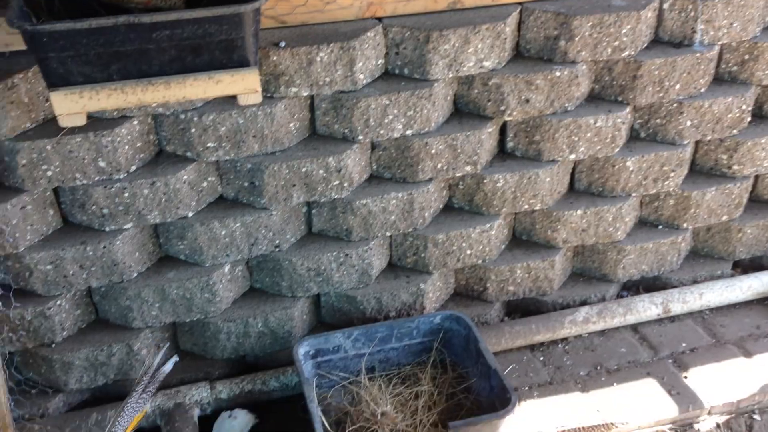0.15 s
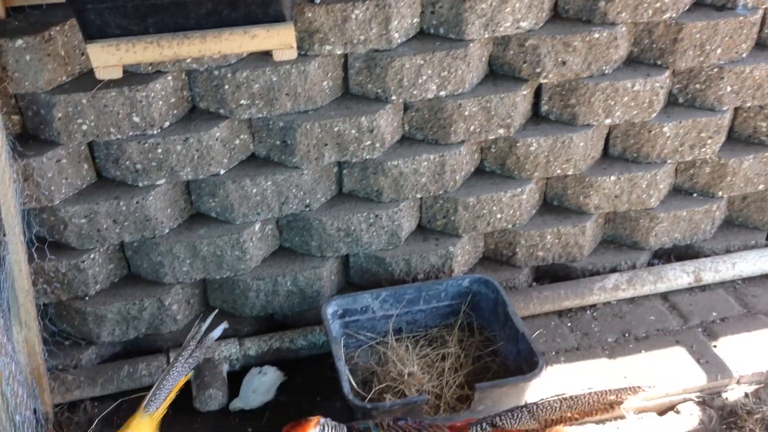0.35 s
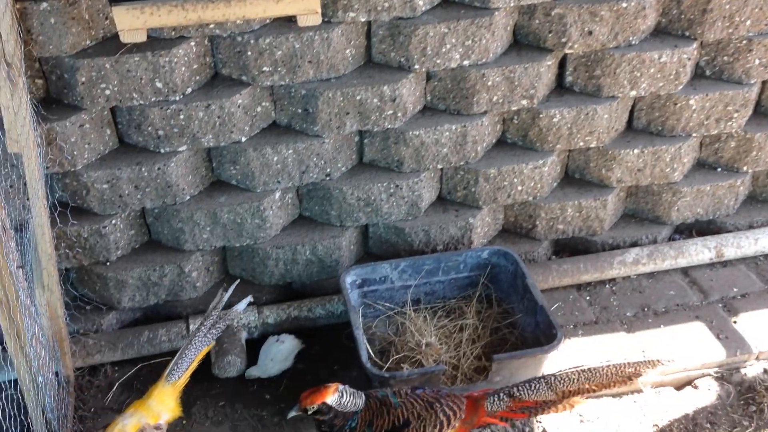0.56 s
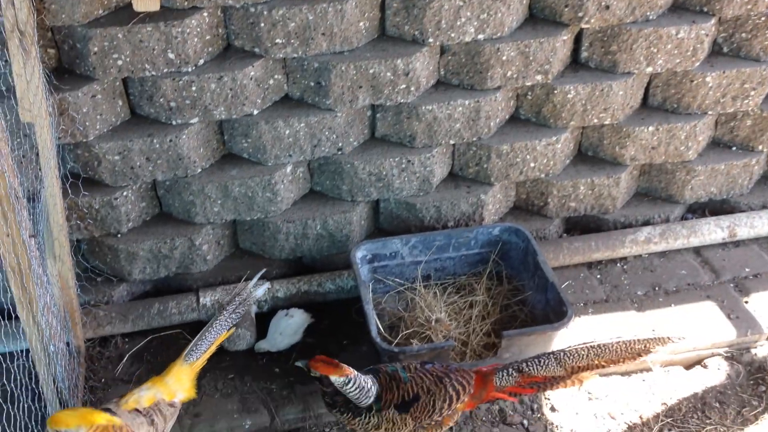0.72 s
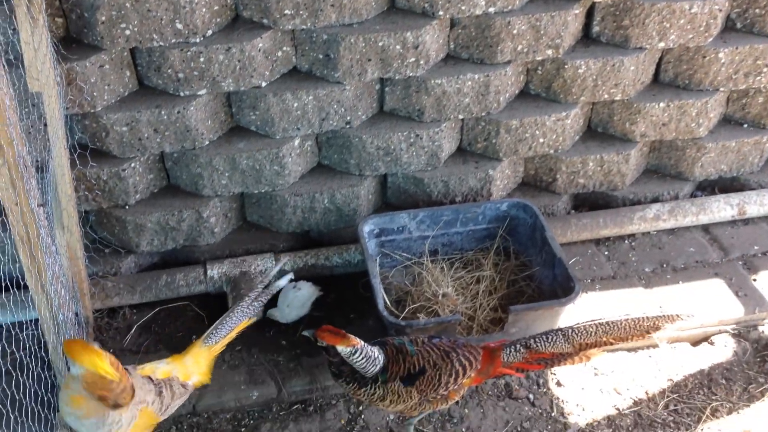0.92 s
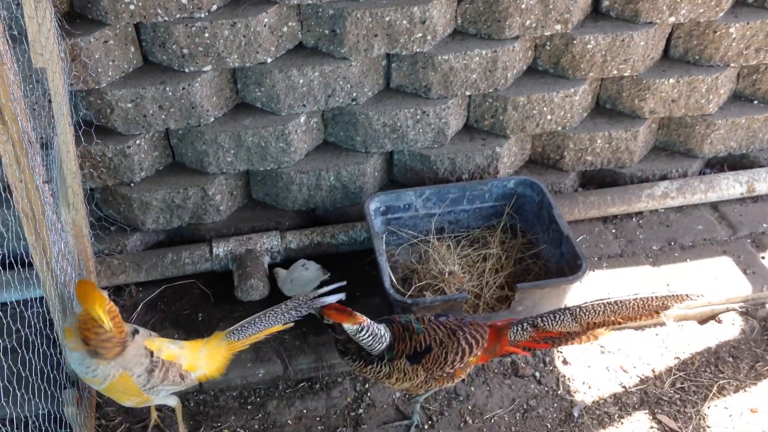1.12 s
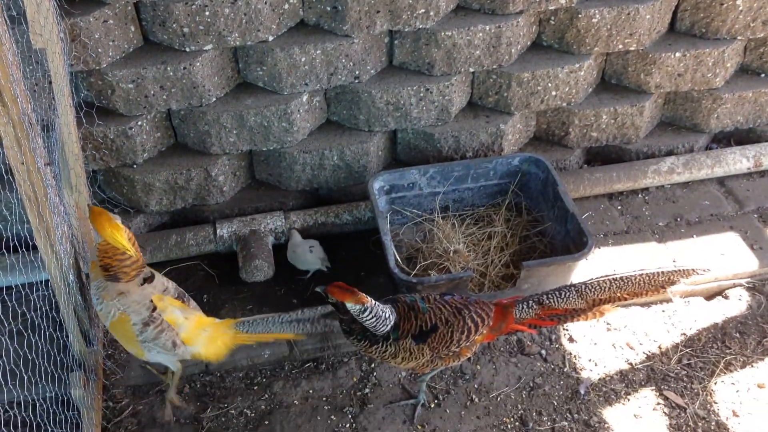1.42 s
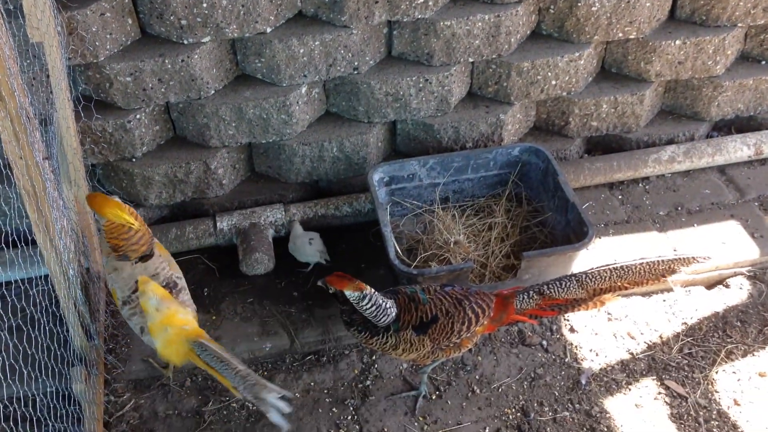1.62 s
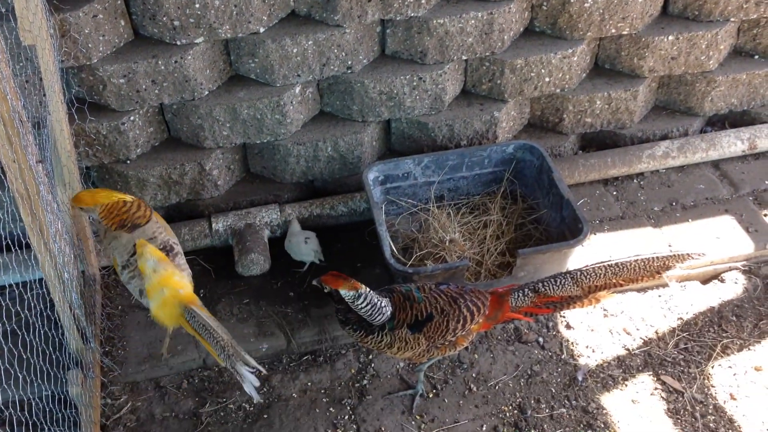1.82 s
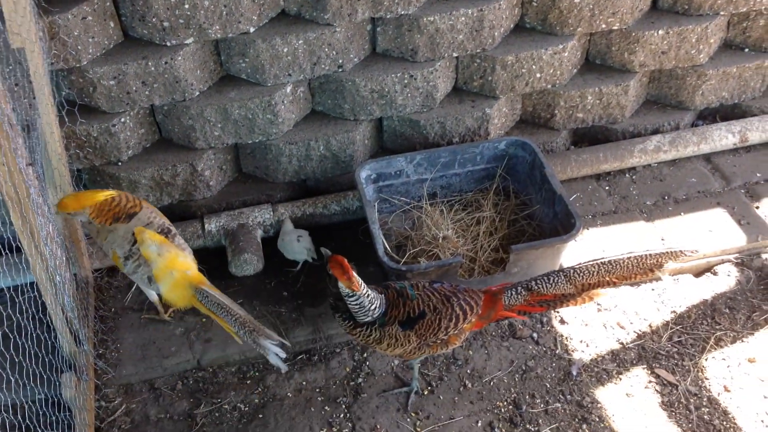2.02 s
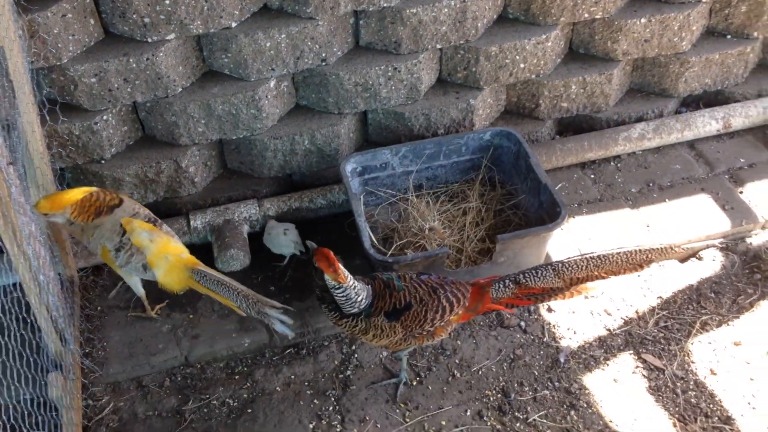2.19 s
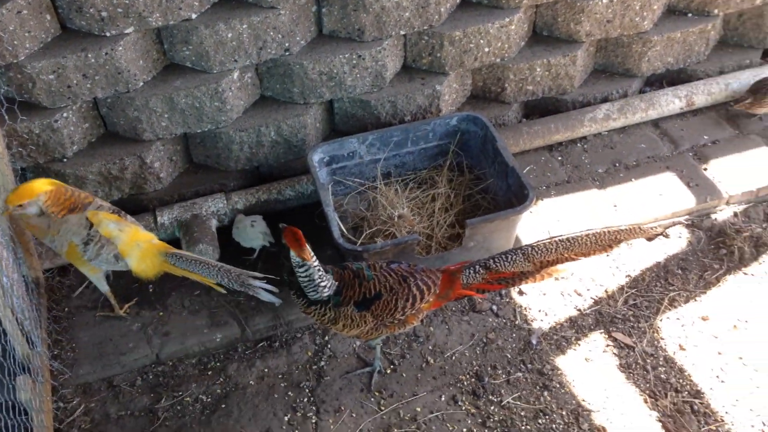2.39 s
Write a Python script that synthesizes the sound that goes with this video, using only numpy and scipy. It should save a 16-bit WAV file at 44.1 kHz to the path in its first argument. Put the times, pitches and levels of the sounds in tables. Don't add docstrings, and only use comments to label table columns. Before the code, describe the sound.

A pheasant-like bird crows three harsh, hoarse syllables in a walled pen, with soft clucks after

```python
import sys
import numpy as np
from scipy import signal
from scipy.fft import rfft, irfft, next_fast_len
from scipy.io import wavfile

SR = 44100
rng = np.random.default_rng(int(sys.argv[2]) if len(sys.argv) > 2 else 0)


def boost_factor(decibels):
    exponent = np.asarray(decibels, float) / 20
    return 10 ** exponent


def int16_out(signal):
    q = np.round(np.clip(np.atleast_2d(signal).T, -1, 1) * 32767)
    wavfile.write(sys.argv[1], SR, q.astype(np.int16))


N = 112454


def rms_one(x):
    return x / np.sqrt(np.mean(x ** 2) + 1e-20)


def drift(rate):
    pole = np.exp(-16 * np.pi * rate / SR)
    white = rng.standard_normal(N // 8 + 8002)
    slow = signal.lfilter([1], [1, -2 * pole, pole * pole], white)[8000:]
    return np.interp(np.arange(N) / 8, np.arange(len(slow)), rms_one(slow))


def band_pass(x, order, low_hz, high_hz):
    return signal.sosfilt(signal.butter(order, [low_hz, high_hz], "band", fs=SR, output="sos"), x)


def air():
    # f/Hz, density/dB per Hz
    air_colour = [(15, -43), (25, -7), (122, 3), (239, 5), (409, -1.5), (508, -1.5), (917, -3),
                  (4240, -8.5), (15400, -28)]
    colour_hz, colour_db = np.transpose(air_colour)
    edges = 22 * 2 ** np.arange(0, 10.1, .5)
    together = drift(9)
    white = rng.standard_normal((2, N))
    out = 0
    for k, (low_hz, high_hz) in enumerate(zip(edges, edges[1:])):
        band = band_pass(white[k % 2], 2, low_hz, min(high_hz, 20000))
        band_db = np.interp(np.log(low_hz * high_hz) / 2, np.log(colour_hz), colour_db)
        out = out + boost_factor(band_db + .5 * together + drift(10)) * band
    return boost_factor(-51.5) * rms_one(out)


def hum():
    # f/Hz, rms level/dB, beat/per s, beat peak t/s, beat depth/0-1
    hum_lines = [(59.3, -73, 1.07, 0.76, 0.1), (119.1, -60, 2.08, 0.749, 0.73),
                 (162.8, -65, 1.16, 0.59, 0.74), (243.1, -64, 2.28, 0.6, 0.02)]
    t = np.arange(N) / SR
    out = 0
    for hz, db, beat, peak_s, depth in hum_lines:
        swell = 1 + depth * np.cos(2 * np.pi * beat * (t - peak_s))
        tone = np.sin(2 * np.pi * hz * t + .5 * drift(2.5))
        out = out + np.sqrt(2) * boost_factor(db + 0.91 * drift(5.1)) * swell * tone
    return out


def rustles():
    # t/s, level/dB, decay/s, low f/Hz, high f/Hz
    straw_steps = [
        (.120, -63, .005, 1500, 12000),
        (1.374, -50, 0.028, 3500, 9000),
        (1.485, -58.5, .01, 3500, 6000),
        (1.628, -53, 0.0036, 1000, 4000),
        (1.961, -53.5, .03, 600, 3980),
        (2.03, -54, 0.06, 1330, 2650),
        (2.125, -57.5, 0.027, 3000, 5170),
        (2.443, -55, 0.0066, 500, 1500),
    ]
    t = np.arange(N) / SR
    grain = rng.standard_normal(N) * boost_factor(3.5 * drift(400))
    out = 0
    for start_s, db, decay_s, low_hz, high_hz in straw_steps:
        onset = np.clip((t - start_s) / 0.0016, 0, 1)
        decay = np.exp(-np.maximum(t - start_s, 0) / decay_s)
        out = out + boost_factor(db) * onset * decay * rms_one(band_pass(grain, 1, low_hz, high_hz))
    return boost_factor(1) * out


def clucks():
    # t/s, peak level/dB, f/Hz, length/s
    cluck_notes = [(0.962, -44, 597, 0.0057), (0.986, -43, 580.5, 0.022), (1.011, -40.5, 458, 0.01),
                   (1.120, -40, 694, 0.015), (1.122, -49, 530, 0.016), (1.112, -46, 350, 0.023),
                   (1.15, -48.5, 685, 0.016), (1.262, -52, 307, .02), (1.335, -39, 907, 0.015),
                   (1.338, -42.5, 784, 0.015), (1.343, -41, 469, 0.0089), (1.679, -41, 558, 0.014),
                   (1.793, -44.5, 754, 0.019), (1.795, -47, 392, 0.013), (1.835, -50.5, 415, 0.018),
                   (1.808, -40.5, 424, 0.017), (1.962, -45.5, 377, 0.021), (1.986, -43, 385, 0.017)]
    sag, second_db = 0.047, -10
    out = np.zeros(N)
    for start_s, db, hz, length_s in cluck_notes:
        u = np.arange(int(2 * length_s * SR)) / (length_s * SR)
        wobble = np.cumsum(rng.standard_normal(len(u))) / np.sqrt(len(u))
        phase = 2 * np.pi * hz * length_s * (u - sag * u ** 2 / 2) + wobble
        swell = np.e * 3 * u * np.exp(-3 * u)
        tone = np.sin(phase) + boost_factor(second_db) * np.sin(2 * phase)
        start = int(start_s * SR)
        out[start:start + len(u)] += boost_factor(db) * swell * tone
    return out


def throat_gain(hz):
    # f/Hz, width/Hz, level/dB
    resonances = [(1174, 361, -10), (1558, 285, -13), (1915, 273, -7), (2347, 410, 0.5), (2785, 146, -5.5),
                  (3292, 500, -11.5), (3574, 500, -27), (4140, 830, -23.5), (4877, 345, -16),
                  (5370, 377, -19), (6870, 4030, -33.5), (11860, 4700, -41.5)]
    return sum(boost_factor(db) / (1 + (2 * (hz - mid_hz) / width) ** 4) for mid_hz, width, db in resonances)


def voice(syllables, weak, surge_db=0, strained=False):
    t = np.arange(N) / SR
    s, *columns = np.transpose(sum(syllables, []))
    db, hz, hoarse_db, first_db = [np.interp(t, s, column) for column in columns]
    jitter_hz = 32 * boost_factor(hoarse_db) * drift(200)
    phase = 2 * np.pi * np.cumsum(hz + jitter_hz) / SR
    flutter_depth_db = 1.2 + 6 * boost_factor(hoarse_db)
    half_share = np.where(hz > 1330, 0.61, 0.12)
    upper_fade_db = .7 * np.minimum(db + 30, 0)
    partials = 0
    for k in np.arange(1, 11, .5 if strained else 1):
        if k == 1:
            own_db = first_db + surge_db / 2
        elif k == 2:
            own_db = surge_db
        else:
            own_db = upper_fade_db + surge_db / max(2, k - 2)
        smear_db = .2 * k
        steadiness = .35 if strained and k == 2 else 1
        flutter_db = (flutter_depth_db + smear_db) * np.minimum(drift(55), 1) * steadiness - smear_db
        gap_db = -13 * (k in weak)
        share = half_share if k % 1 else 1
        tone = np.sin(phase * k + rng.uniform(0, 2 * np.pi))
        partials = partials + share * boost_factor(own_db + flutter_db + gap_db) * throat_gain(hz * k) * tone
    noise = rfft(rng.standard_normal(N))
    breath = rms_one(irfft(noise * throat_gain(np.arange(len(noise)) * SR / N), N))
    breath_db = -3.5 + hoarse_db + surge_db / 3
    sounding = 0
    for rows in syllables:
        sounding = sounding + np.clip(np.minimum((t - rows[0][0]) * 10, rows[-1][0] - t) / .05, 0, 1)
    return sounding * boost_factor(db) * (partials + boost_factor(breath_db) * breath)


def strained_overtone():
    # t/s, level/dB, f/Hz, hoarseness/dB, first partial/dB
    overtone = [
        (1.19, -44, 1245, -16, -20),
        (1.3, -31, 1290, -16, -20),
        (1.36, -30, 1275, -16, -20),
        (1.405, -33, 1210, -14, -20),
        (1.45, -46, 1180, -14, -20),
    ]
    return voice([overtone], weak=(2, 5, 6, 10))


def lower_syrinx():
    # t/s, level/dB, f/Hz, hoarseness/dB, first partial/dB
    low_first = [
        (.21, -51, 870, -6.5, -6),
        (.235, -30, 910.4, -11, 9),
        (.26, -28, 1015, -11, 3),
        (.3, -37.5, 1007, -1, -3),
        (.342, -34, 1017, -0.5, 10),
        (.348, -33.5, 918, -6, 14),
        (.37, -26, 918, -15, -8),
        (.41, -30, 929, -9, 4),
        (.44, -23, 929, -12, 18),
    ]
    low_second = [
        (0.477, -44, 1003, 1, 3),
        (0.489, -32, 1011, -4.5, 8),
        (0.521, -41.5, 1034, -8.5, 4),
        (.63, -38, 1021, -11.5, -11),
        (.72, -68, 1012, -8, -25),
        (0.8, -30, 985, -1.5, -1.5),
        (.86, -35, 970, -3, 2),
        (0.959, -54, 955, -1.5, 10),
    ]
    low_third = [
        (1.044, -54, 932, -11, -29),
        (1.094, -31, 978, -4, 9.5),
        (1.139, -38.5, 964.5, -1.5, 13),
        (1.211, -32, 945, -15.5, -11),
        (1.291, -34, 946, -7.5, -4.5),
        (1.39, -47, 961, -2, 24.5),
        (1.418, -40.5, 975.4, -3, 29.5),
        (1.456, -48.5, 929, 3.5, 23.5),
        (1.541, -39, 904, 1, 12),
    ]
    return voice([low_first, low_second, low_third], weak=(3, 7))


def upper_syrinx():
    # t/s, level/dB, f/Hz, hoarseness/dB, first partial/dB
    high_first = [
        (.21, -47, 922.6, -0.5, 15),
        (.24, -43, 1000, -8.5, 12.5),
        (.258, -34.5, 1146, -4, 6),
        (.295, -25, 1168, -14.5, -18),
        (.33, -28, 1147, -4, -13),
        (.37, -31, 1145, -11, -28),
        (.4, -57, 1160, -1.5, 0),
        (.47, -47, 1170, -3.5, -5),
    ]
    high_second = [
        (.476, -43, 1210, -4.5, -9),
        (0.487, -46, 1218, -2.5, 7),
        (0.504, -27.5, 1227, -2, 0),
        (.51, -28, 1380, -8, 2.5),
        (.57, -25.5, 1365, -5, 10),
        (.585, -29, 1214, -12.5, 0),
        (0.719, -27, 1266, -6.5, 0.5),
        (.83, -35, 1203, -3.5, 3),
        (0.971, -69, 1187, -0.5, 4),
    ]
    high_third = [
        (1.04, -50.5, 1187, 2.5, -2),
        (1.11, -48, 1189, -2, -27),
        (1.124, -31.5, 1184, -17.5, 4),
        (1.18, -28.5, 1195, -12, -3),
        (1.226, -34.5, 1244, -5.5, -2.5),
        (1.3, -33.5, 1200, -3.5, 6.5),
        (1.393, -34.5, 1111, -11, 0),
        (1.419, -35.5, 1129, -6.5, -16),
        (1.65, -62, 1104, 1, -2),
    ]
    # t/s, gain/dB, half width/s
    surges = [(0.257, 7, 0.0038), (.273, 3, .005), (0.281, -8, 0.0025), (.302, -1.5, 0.0044),
              (.317, -10, 0.0017), (0.328, -2, 0.0018), (0.337, -7, 0.0017), (.345, -4, 0.0023),
              (.355, -0.5, 0.0037), (.512, 4, 0.0065), (.559, -15, 0.0075), (.599, 6, 0.0087),
              (.611, -9, .003), (0.628, -26, 0.004), (0.644, 3.5, 0.006), (.663, -5, 0.0019),
              (0.67, 8, 0.0026), (.674, -17, 0.0022), (0.681, -6, 0.0014), (.706, -2, .006),
              (.716, 7, .003), (.723, -18, 0.0031), (.746, -4, .005), (.759, 12.5, 0.0066),
              (.768, 1, 0.0015), (.772, 6, .002), (.78, 6, 0.0027), (.789, -17, .004), (.797, 9, 0.0035),
              (.805, -6, .003), (.814, 6, 0.0032), (1.132, 8.5, 0.012), (1.156, 7.5, 0.013),
              (1.193, -16, .0067), (1.206, -1, 0.0071), (1.229, -12, 0.0066), (1.269, 4, 0.0045),
              (1.273, -10.5, 0.0019), (1.281, 0, .002), (1.287, 5, 0.0026), (1.29, -12, 0.001),
              (1.294, 8.5, .003), (1.301, 7, 0.0022), (1.31, 8, 0.0023), (1.317, 8.5, 0.0015),
              (1.321, -12, .002), (1.326, -2, .003), (1.331, -14, 0.0016), (1.337, 7.5, 0.0037),
              (1.34, -8, 0.0012), (1.352, -2, 0.0059), (1.369, -3, .003), (1.377, 12.5, 0.0038),
              (1.391, 15.5, 0.0074), (1.416, 1.5, .004), (1.434, -8, 0.011), (1.458, 4.5, .01)]
    t = np.arange(N) / SR
    surge_db = sum(gain_db * np.exp(-((t - at_s) / half_s) ** 2) for at_s, gain_db, half_s in surges)
    return voice([high_first, high_second, high_third], (5, 10), surge_db, strained=True)


def yard(x):
    t60_s, wall_cut_hz = 0.29, 32000
    size = next_fast_len(N + SR)
    w = 2 * np.pi * np.arange(size // 2 + 1) / size
    dull = 1 / (1 + 1j * w * SR / (2 * np.pi * wall_cut_hz * 3))
    echoes = 0
    for k, lag in enumerate(rng.uniform(.011, .045, 10) * SR):
        loop = boost_factor(-60 * lag / SR / t60_s) * dull * np.exp(-1j * w * lag)
        echoes = echoes + (-1) ** k * loop / (1 - loop)
    return irfft(rfft(x, size) * echoes, size)[:N] / np.sqrt(10)


def thin_bands(x):
    # start t/s, end t/s, f/Hz, width/Hz
    dropouts = [
        (.35, .4, 5900, 130),
        (.59, .84, 3000, 95),
        (.66, .81, 5740, 80),
        (1.115, 1.17, 2900, 130),
        (1.215, 1.25, 5750, 110),
    ]
    t = np.arange(N) / SR
    hz = np.arange(N // 2 + 1) * SR / N
    spectrum = rfft(x)
    lost = 0
    for start_s, end_s, mid_hz, width_hz in dropouts:
        fade = np.clip(np.minimum(t - start_s, end_s - t) / .015, 0, 1)
        lost = lost + fade * irfft(spectrum * np.exp(-((hz - mid_hz) / width_hz) ** 6), N)
    return x - lost


def scene():
    crow = upper_syrinx() + lower_syrinx() + strained_overtone()
    near = clucks()
    spectrum = rfft(crow + near + boost_factor(-4.5) * yard(crow + near / 2))
    hz = np.arange(len(spectrum)) * SR / N
    notch = 1 - .93 * np.exp(-((hz - 2990) / 150) ** 2)
    return (irfft(spectrum * notch, N) + rustles() + air() + hum())[None]


def band_limit(x):
    return signal.sosfilt(signal.butter(12, 15570, fs=SR, output="sos"), x)


def record(dry):
    low_cut = signal.sosfilt(signal.butter(2, 40.2, "high", fs=SR, output="sos"), dry)
    top_cut = signal.sosfilt(signal.ellip(12, .5, 60, 15400, fs=SR, output="sos"), low_cut)
    return band_limit(thin_bands(top_cut))


dry = scene()
out = record(dry)
int16_out(out)
```